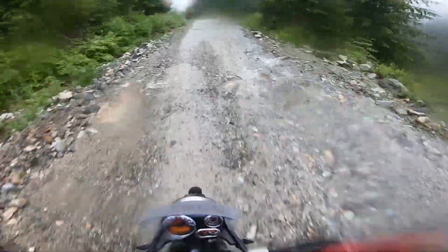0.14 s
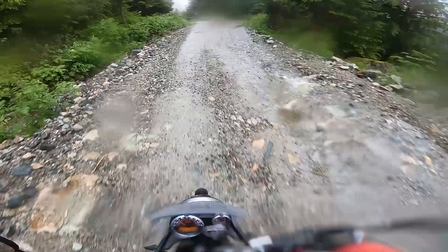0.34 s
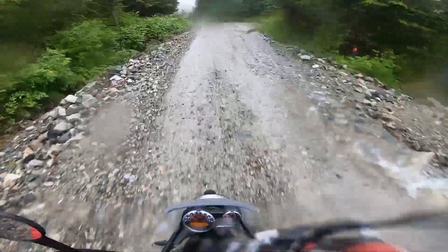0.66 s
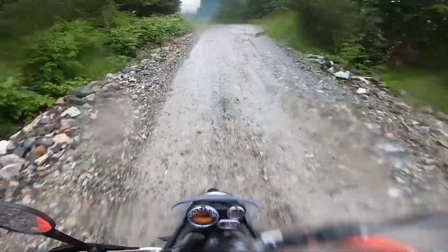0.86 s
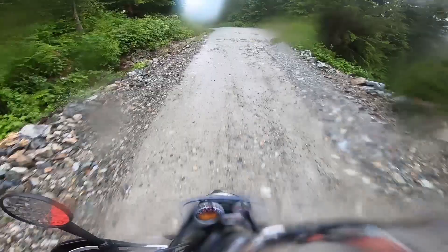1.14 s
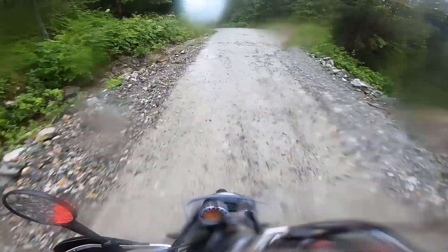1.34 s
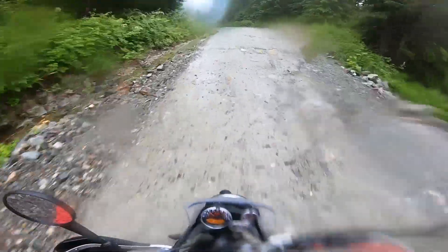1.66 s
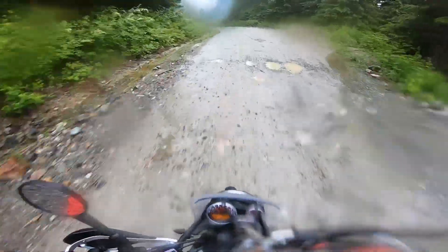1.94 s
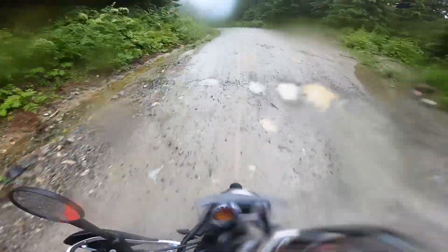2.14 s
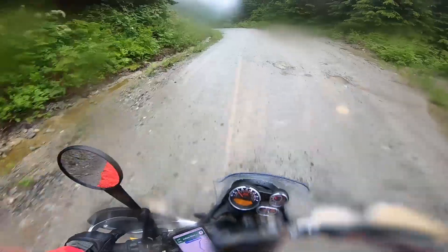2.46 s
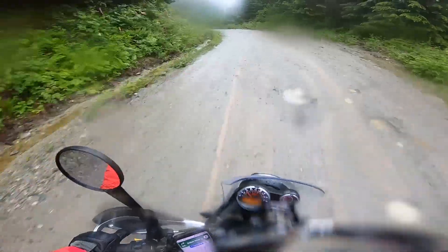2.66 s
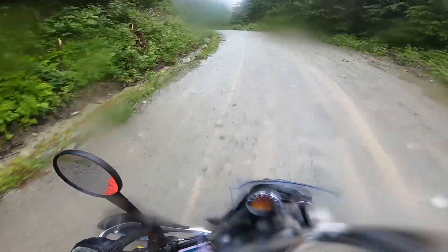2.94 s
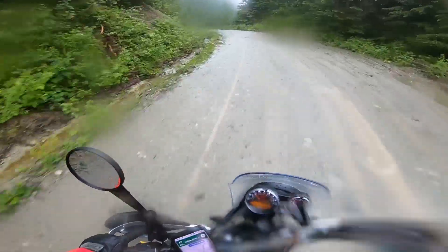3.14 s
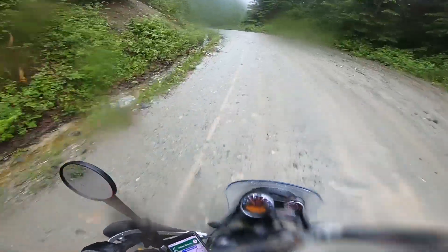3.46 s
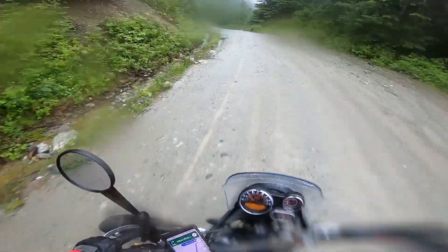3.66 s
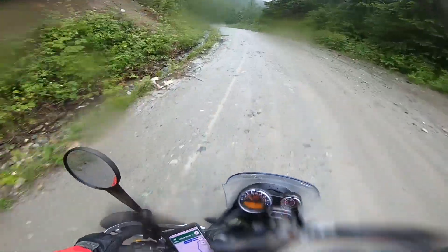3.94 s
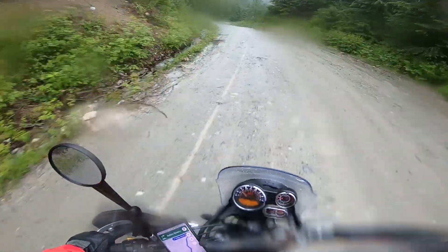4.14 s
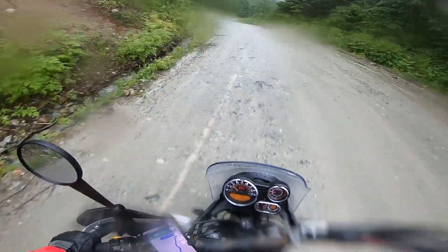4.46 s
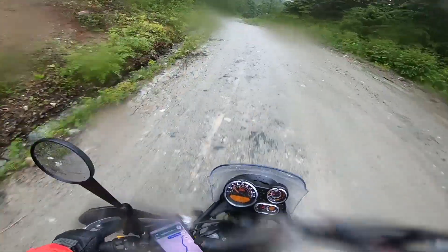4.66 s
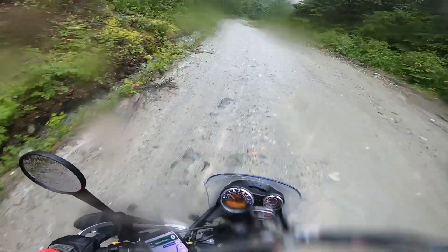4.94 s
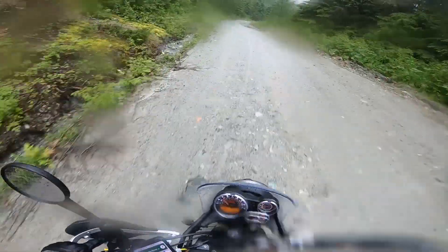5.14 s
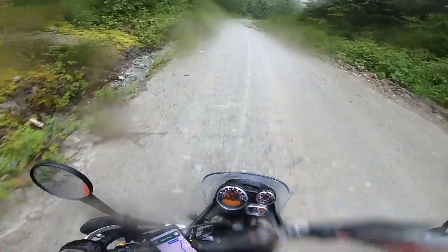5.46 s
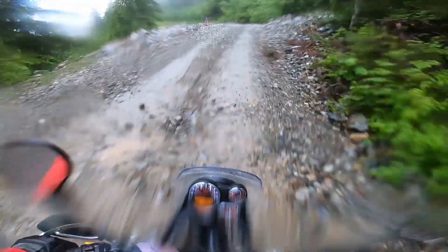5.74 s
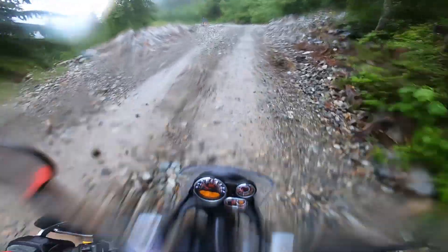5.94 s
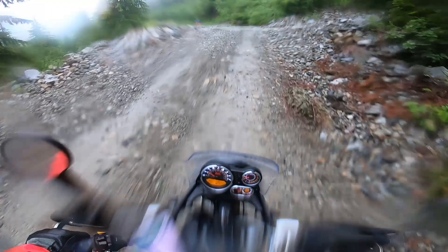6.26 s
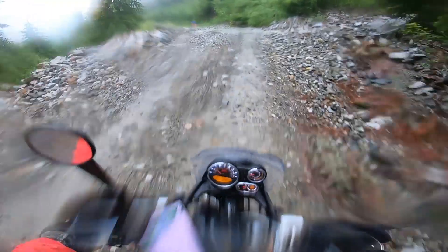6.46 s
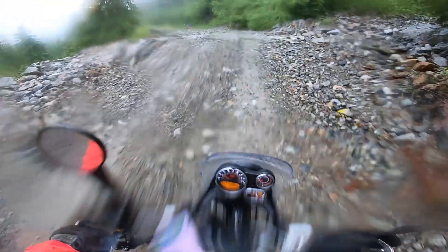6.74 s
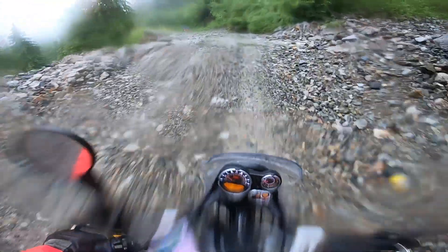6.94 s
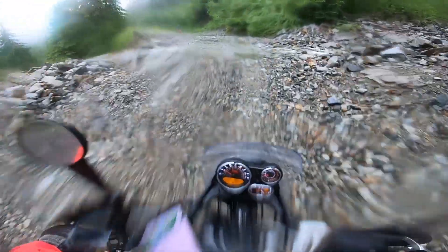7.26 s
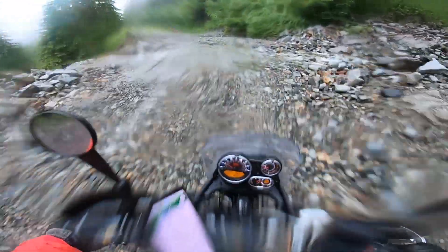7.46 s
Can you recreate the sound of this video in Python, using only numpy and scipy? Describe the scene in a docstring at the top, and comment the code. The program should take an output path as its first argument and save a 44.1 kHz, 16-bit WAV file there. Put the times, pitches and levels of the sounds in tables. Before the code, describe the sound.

Muffled onboard sound of a one-cylinder motorbike on wet stones: fast throbbing exhaust, gritty tyre roar, ringing panels, then suddenly a slower stretch.

```python
"""On a wet gravel track: a single-cylinder motorcycle rolls by, heard from a muffled microphone on the rider.
Wind is low lumpy noise, grit is short ticks, and the tyres roar in flickering bands of noise.
Loose bodywork, panels and thrown stones ring as resonances. Each firing thumps the exhaust as a set
of low tones and barks through the header pipe, more with open throttle. A slower stretch starts abruptly."""
import sys
import numpy as np
from scipy import signal
from scipy.io import wavfile
from scipy.ndimage import uniform_filter1d

SR = 44100
rng = np.random.default_rng(int(sys.argv[2]) if len(sys.argv) > 2 else 0)


def generate_wav(signal):
    """Clip the signal to [-1, 1] and save it as 16-bit WAV at the path in sys.argv[1]."""
    frames = np.transpose(np.atleast_2d(signal))
    scaled = np.clip(frames, -1, 1) * 32767
    pcm = np.round(scaled).astype(np.int16)
    wavfile.write(sys.argv[1], SR, pcm)


def to_linear_factor(level_db):
    """Convert decibel levels (scalar or array-like) to linear amplitude factors."""
    exponent = np.asarray(level_db, float) / 20
    return 10 ** exponent


N = 335160


def rms_one(x):
    """Scale to rms 1."""
    return x / np.sqrt(np.mean(x ** 2) + 1e-20)


def in_time(rows):
    """Read the columns of a table sample by sample, with straight lines between its rows."""
    s, *columns = np.transpose(rows)
    return [np.interp(np.arange(N) / SR, s, c) for c in columns]


def at_hz(points, hz):
    """Read the level of a spectrum table at a pitch, on a log-frequency axis."""
    table_hz, table_db = np.transpose(points)
    return np.interp(np.log(hz), np.log(table_hz), table_db)


def drift(rate):
    """Slow random wandering of spread 1; a higher rate (Hz) wanders faster."""
    r = np.exp(-80 * np.pi * rate / SR)   # made at every 40th sample
    slow = signal.lfilter([1], [1, -2 * r, r * r], rng.standard_normal(N // 40 + 2002))[2000:]
    return np.interp(np.arange(N) / 40, np.arange(len(slow)), rms_one(slow - slow.mean()))


def bandpass(x, order, low_hz, high_hz):
    """Keep only the sound between two pitches."""
    return signal.sosfilt(signal.butter(order, [low_hz, high_hz], "band", fs=SR, output="sos"), x)


def lowpass(x, order, hz):
    """Keep only the sound below a pitch."""
    return signal.sosfilt(signal.butter(order, hz, fs=SR, output="sos"), x)


def resonance(x, hz, width_hz):
    """Ring like a part with one natural pitch: a two-pole peak of gain 1."""
    r = np.exp(-np.pi * width_hz / SR)
    b = (1 - r * r) / 2 * np.array([1, 0, -1])
    a = [1, -2 * r * np.cos(2 * np.pi * hz / SR), r * r]
    return signal.lfilter(b, a, x)


def rings(x, modes):
    """Sum of natural pitches, each a pair of resonances in a row."""
    out = 0
    for hz, width_hz, db in modes:
        first = resonance(x, hz, width_hz)
        out = out + to_linear_factor(db) * resonance(first, hz, 0.83 * width_hz)
    return out


def evened(x, span_s):
    """Hold the level at rms 1 over a moving span."""
    return x / np.sqrt(uniform_filter1d(x ** 2, int(span_s * SR)) + 1e-12)


def wind(wind_db):
    """Lumpy low buffeting on the microphone port: noise of wandering strength around 30-70 Hz."""
    noise = rng.standard_normal(N) * to_linear_factor(0.9 * drift(1.7))
    return to_linear_factor(wind_db) * rms_one(bandpass(noise, 2, 30, 70))


# grit striking the housing: (t/s, level/dB, f/Hz)
GRIT_TICKS = [(0.077, -54, 11400), (2.433, -52, 10900), (2.4758, -49.5, 11700), (2.8, -46.5, 10800),
              (3.659, -51, 11600), (4.2284, -48.5, 11400), (5.021, -49, 11500), (5.326, -51, 11800),
              (5.9785, -53, 11200), (6.599, -50.5, 11460), (7.0588, -47.5, 10700), (3.4865, -45, 7900),
              (3.7047, -41.5, 7200), (3.9, -41.5, 7360), (5.7636, -34, 7600)]


def grit():
    """Each grain is a tick: a sine of a few cycles that swells and dies at once."""
    out, t = np.zeros(N), np.arange(200) / SR
    for s, db, hz in GRIT_TICKS:
        i = round(s * SR)
        envelope = t / 0.000077 * np.exp(1 - t / 0.00013)
        out[i:i + 200] += to_linear_factor(db) * np.sin(2 * np.pi * hz * t) * envelope
    return out


# tone colour of the tyre roar: (f/Hz, relative level/dB)
ROAR_COLOUR = [(130, -3.5), (210, -7.5), (310, -8), (600, -16.5), (900, -17), (1400, -20.5), (2050, -24),
               (3000, -28.5), (4000, -42.5), (5200, -40), (6300, -52.5), (7800, -50), (9800, -65),
               (11800, -74.5), (13500, -82)]
# coarser gravel of the slow stretch, change of that colour: (f/Hz, change of level/dB)
COARSE_GRAVEL = [(200, -2.5), (330, 1.5), (560, -3), (1500, 2), (5000, 3), (8000, 5), (9000, 4.5)]


def tyres(slow, roar_db, patchy_db):
    """Crushed gravel and spray: third-octave bands of noise, each flickering a little."""
    roar, together = 0, drift(9)
    edges = 130 * 2 ** np.arange(0, 7, 1 / 3)
    white, crunch = rng.standard_normal((2, N)), drift(47)
    for k, (low, high) in enumerate(zip(edges, edges[1:])):
        band = bandpass(white[k % 2], 3, low, high)
        hz = np.sqrt(low * high)
        colour_db = at_hz(ROAR_COLOUR, hz) + slow * at_hz(COARSE_GRAVEL, hz)
        flicker_db = patchy_db * (0.5 * together + .5 * crunch + drift(26))
        roar = roar + band * to_linear_factor(colour_db + flicker_db)
    hiss = resonance(resonance(white[1], 11040, 700), 11060, 900)
    spray = to_linear_factor(-53 + 1.4 * together) * rms_one(hiss)   # fine spray hisses in the housing
    return to_linear_factor(roar_db + 5.5) * (rms_one(roar) + spray)


# stones thrown against the bodywork: (t/s, level/dB, f/Hz)
STONE_HITS = [(0.297, -18, 1050), (0.819, -19, 1500), (2.194, -20, 1280), (2.513, -28, 1300),
              (2.736, -24, 990), (4.231, -32, 1090), (6.329, -19.5, 1030), (6.711, -22, 1250),
              (6.854, -23, 1080), (7.031, -29, 1560), (7.563, -25, 1170)]
# bodywork shaken by engine and road: (f/Hz, width of the first resonance/Hz, relative level/dB)
BODY_MODES = [(771, 76, -5), (990, 110, -3.5), (1091, 150, -2.5)]
KNOCK_S = .0012   # time for a knock to reach full strength


def thrown_stones():
    """Each stone sets the bodywork ringing and gives a short knock of its own pitch."""
    hits = np.full(N, 1e-18)
    knock = np.zeros(N + 800)
    t = np.arange(800) / SR
    envelope = t / KNOCK_S * np.exp(1 - t / KNOCK_S)
    for s, db, hz in STONE_HITS:
        i = round(s * SR)
        hits[i] = to_linear_factor(db + 29)
        knock[i:i + 800] += to_linear_factor(db) * np.sin(2 * np.pi * hz * t) * envelope
    hits = lowpass(hits, 4, 2000)   # blunt contact
    return rings(hits, BODY_MODES) + knock[:N]


# thin panels: (f/Hz for finding the nearest panel, width/Hz, relative level/dB)
THIN_PANELS = [(1380, 45, 0), (1480, 40, -4), (1700, 45, -8), (2248, 42, -1.5), (2940, 55, -11)]
# a panel rings out for a while: (start t/s, end t/s, f/Hz, gain level/dB)
PANEL_SWELLS = [(0.2, 1.3, 1354, 12), (3.295, 4.2, 1700, 10), (0.903, 1.423, 2930, 23.5),
                (1.0, 1.445, 2235, 14.5), (1.456, 2.338, 2260, 17.5), (1.502, 3.303, 2923, 16.5),
                (2.353, 2.805, 2280, 12), (1.502, 3.3, 1461, 10), (2.2, 3.303, 1377, 12),
                (2.797, 3.432, 2258, 16.5), (3.3, 4.497, 1395, 6.5), (3.6, 4.303, 2240, 11.5),
                (4.57, 5.673, 2267, 12.5), (4.702, 5.502, 1386, 11), (6.127, 7.253, 2235, 9),
                (6.13, 7.1, 2300, 9.5)]
SWELL_EDGE_S = .12   # length of each rise and fall


def panels(knocks, ring_db):
    """Each swell rings its panel, a little off in pitch each time, rising and falling softly."""
    t, out = np.arange(N) / SR, 0
    for start, end, hz, gain_db in PANEL_SWELLS:
        _, width, db = min(THIN_PANELS, key=lambda panel: abs(panel[0] - hz))
        gate = uniform_filter1d(1. * (t > start) * (t < end), int(SWELL_EDGE_S * SR))
        ring = evened(resonance(resonance(knocks, hz, width), hz, width), .045)
        wander_db = 1.0 * drift(4) + 1.2 * drift(10)
        out = out + gate * to_linear_factor(ring_db + db + gain_db + wander_db - 1) * ring
    return out


# hollow parts heard ringing only in the slow stretch:
# (f/Hz, width of the first resonance/Hz, relative level/dB)
HOLLOW_PARTS = [(734, 48, -5), (980, 67, -8), (1058, 55, -4), (1574, 190, -12.5)]


def bodywork(cycles, slow, rattle_db, ring_db):
    """Loose parts shaken mostly twice a firing cycle ring, along with thrown stones and thin panels."""
    shaking = 1 + 0.37 * np.cos(4 * np.pi * cycles - 1.1) + 0.071 * np.cos(2 * np.pi * cycles - .6)
    knocks = rng.standard_normal(N) * shaking * to_linear_factor(1.6 * drift(21) + 0.36 * drift(78))
    rattle = to_linear_factor(rattle_db - 1.5 - 1.3 * slow) * rms_one(rings(knocks, BODY_MODES))
    hollow = 0
    for hz, width, db in HOLLOW_PARTS:
        part = evened(rings(knocks, [(hz, width, 0)]), 0.097)
        hollow = hollow + slow * to_linear_factor(rattle_db + db) * part
    # before the slow stretch a broad, brighter clatter
    clatter = ~slow * to_linear_factor(rattle_db - 3.5) * rms_one(rings(knocks, [(1250, 830, 0)]))
    return rattle + clatter + hollow + thrown_stones() + panels(knocks, ring_db)


# single strokes that differ in strength, mostly harder: (t/s, change of bark level/dB)
ODD_STROKES = [(3.385, 2.5), (3.64, 2), (5.93, 8), (6.97, 4), (7.018, -1), (7.166, 1.5), (7.406, 4.5),
               (7.556, 7.5)]
STROKE_S = 0.016   # spread of the bell-shaped change around each stroke


def stroke_db():
    """Change of strength in dB around the strokes that differ."""
    t = np.arange(N) / SR
    return sum(db * np.exp(-.5 * ((t - s) / STROKE_S) ** 2) for s, db in ODD_STROKES)


PULLING_FROM = 0.519   # throttle opening (0-1) above which the boom changes


def pulling(throttle):
    """How far the throttle is past the opening where the engine pulls hard, 0-1."""
    return np.clip((throttle - PULLING_FROM) / (1 - PULLING_FROM), 0, 1)


# the silencer passes each multiple of the firing rate by its pitch: (f/Hz, level/dB)
SILENCER_RESPONSE = [(42, -34.5), (52, -31), (61, -29.5), (70, -23.5), (80, -20), (92, -18), (105, -20.5),
                     (116, -24), (126, -31.5), (140, -32), (158, -44.5), (190, -50.5)]
# second to sixth multiple of the firing rate: (level/dB, change of level at full throttle/dB)
MULTIPLES = [(-3.5, 10.5), (1, -4.5), (1.5, -27), (2, 5), (0, 5)]
# wavering strength of the boom: (t/s, level/dB)
BOOM_STRENGTH = [(0, -0.5), (1.1, -1.5), (1.5, 0.5), (2.5, 0), (2.75, 0), (3.2, 3.5), (3.7, -0.5),
                 (4.6, -0.5), (5.0, -2), (5.7, 0), (6.1, -4), (7.0, -2.5), (7.6, -2.5)]
BOOM_LEAD = .195   # firing cycles by which the boom runs ahead
SILENCER_HZ, SILENCER_WIDTH_HZ = 91, 22   # its ring delays the multiples around this pitch


def silencer_boom(cycles, firing_hz, throttle):
    """The silencer booms on low multiples of the firing rate, each a tone of wandering level and phase."""
    boom = 0
    for k, (db, pulled_db) in enumerate(MULTIPLES, start=2):
        hz = k * firing_hz
        lag = np.arctan(2 * (hz - SILENCER_HZ) / SILENCER_WIDTH_HZ)
        level_db = at_hz(SILENCER_RESPONSE, hz) + db + pulled_db * pulling(throttle)
        wander_db = 0.92 * drift(3.5) + 1.4 * drift(15)
        wobble = .025 * drift(5) + .013 * drift(12)   # in cycles of the tone
        phase = 2 * np.pi * (k * (cycles + BOOM_LEAD) + wobble) - lag
        boom = boom + to_linear_factor(level_db + wander_db) * np.sqrt(2) * np.cos(phase)
    return to_linear_factor(in_time(BOOM_STRENGTH)[0]) * lowpass(boom, 2, 900)


def firings(cycles, jitter_s, uneven_db):
    """One click a cycle, each a little off in time and strength."""
    at = np.flatnonzero(np.diff(np.floor(cycles)) > 0)
    chance = rng.standard_normal((400, 2))[:len(at)]
    moved = at + (jitter_s * SR * chance[:, 0]).astype(int)
    clicks = np.full(N, 1e-18)
    clicks[np.clip(moved, 0, N - 1)] = to_linear_factor(uneven_db * chance[:, 1])
    return clicks


BARK_SHUT_DB, BARK_OPEN_DB = -42.5, -24   # by throttle, before the strokes that differ


def bark_db(throttle):
    """The bark grows with the throttle; a few strokes differ in strength."""
    return BARK_SHUT_DB + (BARK_OPEN_DB - BARK_SHUT_DB) * throttle + stroke_db()


# header pipe: (f/Hz, width/Hz, relative level/dB)
HEADER_PIPE = [(191, 91, -12), (269.4, 43.5, 7.5), (307, 65, 6), (417, 57, -11), (355, 260, -11.5)]
BARK_ADVANCE = .11   # cycles by which the bark comes earlier at full throttle


def header_bark(cycles, throttle, turbulence):
    """Each firing is a click with a little turbulent noise that rings the header pipe."""
    bark_cycles = cycles + .235 + BARK_ADVANCE * pulling(throttle)
    blow = rms_one(firings(bark_cycles, jitter_s=.00012, uneven_db=1.3)) + .05 * turbulence
    bark = 0
    for k, (hz, width, db) in enumerate(HEADER_PIPE):
        bark = bark + (-1) ** k * to_linear_factor(db) * resonance(blow, hz, width)   # alternating sign
    return to_linear_factor(bark_db(throttle)) * evened(bandpass(bark, 2, 150, 480), 0.51)


def exhaust(cycles, firing_hz, throttle):
    """Silencer boom and header bark over a steady rumble of turbulent gas, noise ringing near 90-100 Hz."""
    turbulence = rng.standard_normal((2, N))
    rumble = to_linear_factor(-29) * rms_one(resonance(resonance(turbulence[0], 100.5, 35), 90, 77))
    boom = silencer_boom(cycles, firing_hz, throttle)
    return boom + rumble + header_bark(cycles, throttle, turbulence[1])


# engine speed, lower in the slower stretch that starts abruptly at about 5.57 s: (t/s, firing rate f/Hz)
ENGINE_SPEED = [(0.0, 28.8), (0.15, 29.8), (0.7, 30.9), (1.1, 31.6), (1.27, 31.3), (1.43, 29.4),
                (1.65, 30.5), (1.9, 30.8), (2.28, 32.5), (2.68, 28.4), (2.9, 29.5), (3.28, 27.5),
                (3.7, 27.5), (3.92, 26.8), (4.55, 26.8), (4.74, 25.7), (4.95, 26.5), (5.16, 25.6),
                (5.565, 27.8), (5.575, 23.9), (5.78, 22.4), (6.17, 24.7), (6.4, 22.6), (6.82, 22.8),
                (7.01, 20.8), (7.19, 20.4), (7.4, 21.1), (7.6, 18.4)]
# throttle: (t/s, opening 0-1)
THROTTLE_OPENING = [(0.0, 0.84), (0.8, 0.91), (0.95, 0.42), (1.25, 0), (1.8, 0.6), (2.35, 0.78),
                    (2.72, 0.54), (3.0, 0.77), (3.4, 0.59), (4.6, 0.47), (5.55, 0.54), (5.6, 0.17),
                    (6.05, 0.15), (6.18, 0.71), (6.35, 0.7), (6.55, 0.95), (6.9, 0.83), (7.05, 0.2),
                    (7.3, 0.46), (7.6, 0.49)]
# the road: (t/s, tyre roar relative level/dB, extra rattle from bumps level/dB)
ROAD = [(0.0, -30, -2), (0.3, -31, 2.5), (0.9, -29, 4.5), (1.3, -30.5, 0), (1.8, -32, -7),
        (2.9, -31.5, -4.5), (3.5, -35, -3.5), (5.3, -36.5, -2.5), (5.55, -36, 3.5), (5.6, -39, -4),
        (6.0, -37, -1), (6.2, -36.5, 1.5), (6.8, -36, 3), (7.25, -37.5, 2.5), (7.6, -40, -0.5)]
JUMP_S = 5.572   # start of the slower stretch
RATTLE_SHUT_DB, RATTLE_OPEN_DB = -42, -34.5   # reference for the loose parts, by throttle
RATTLE_SMOOTHING_S = 0.23   # span over which the throttle is averaged for the rattle
STROKE_JOLT = .4   # share of the stroke changes that also reaches the tyre roar


def scene():
    """Throttle, engine speed and road shape tyres, bodywork and exhaust, over wind and scattered grit ticks."""
    throttle = np.clip(in_time(THROTTLE_OPENING)[0], 0, 1)
    roar_db, bumps_db = in_time(ROAD)
    firing_hz, = in_time(ENGINE_SPEED)
    cycles = np.cumsum(firing_hz) / SR
    jump = round(JUMP_S * SR)
    slow = np.arange(N) >= jump
    cycles[jump:] += .15 - cycles[jump] % 1   # the slow stretch starts at another point of the cycle
    cycles += .45
    shake = uniform_filter1d(throttle, int(RATTLE_SMOOTHING_S * SR))
    rattle_db = RATTLE_SHUT_DB + (RATTLE_OPEN_DB - RATTLE_SHUT_DB) * shake + bumps_db
    background = wind(wind_db=-26.5) + grit()
    rolling = tyres(slow, roar_db + STROKE_JOLT * stroke_db(), patchy_db=1.5)
    loose_parts = bodywork(cycles, slow, rattle_db, ring_db=-55)
    mix = background + rolling + loose_parts + exhaust(cycles, firing_hz, throttle)
    return mix[None]   # one channel


def low_pass(x):
    """Removes everything above the highest recorded frequency."""
    return signal.sosfilt(signal.butter(12, 13600, fs=SR, output="sos"), x)


def record(dry):
    """The microphone signal has its peaks softly rounded toward a ceiling of 0.7."""
    rounded = .7 * np.tanh(dry / .7)
    return low_pass(rounded)


dry = scene()
out = record(dry)
generate_wav(out)
```